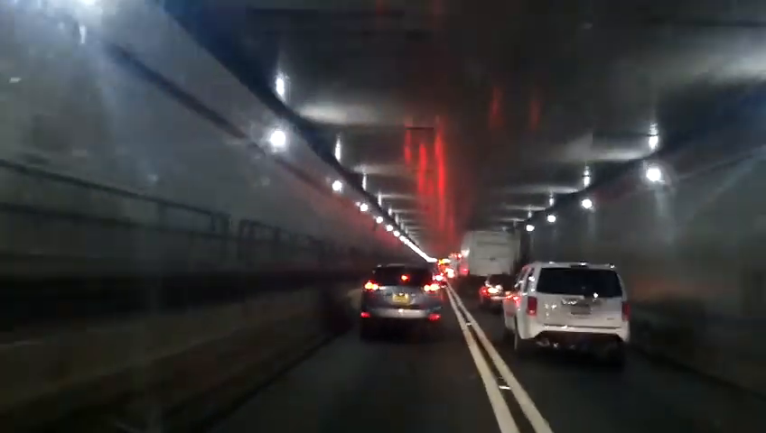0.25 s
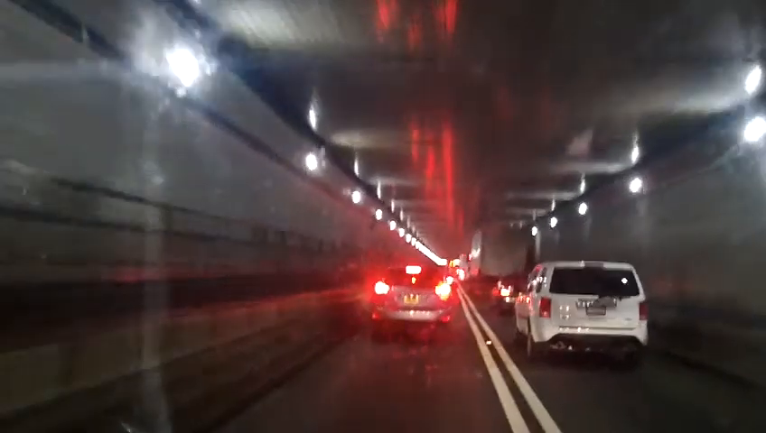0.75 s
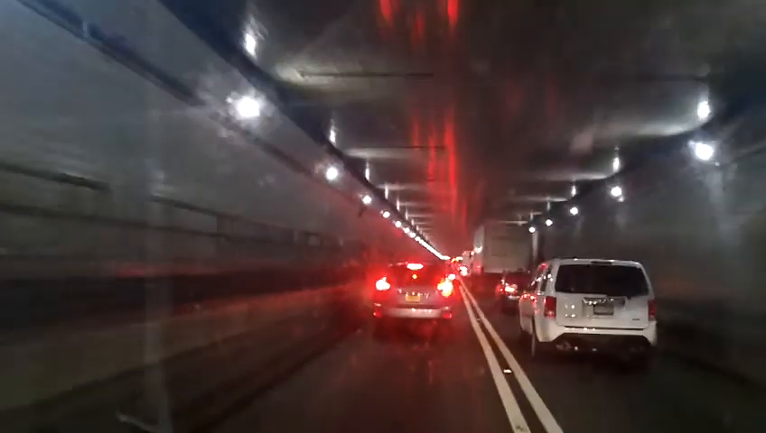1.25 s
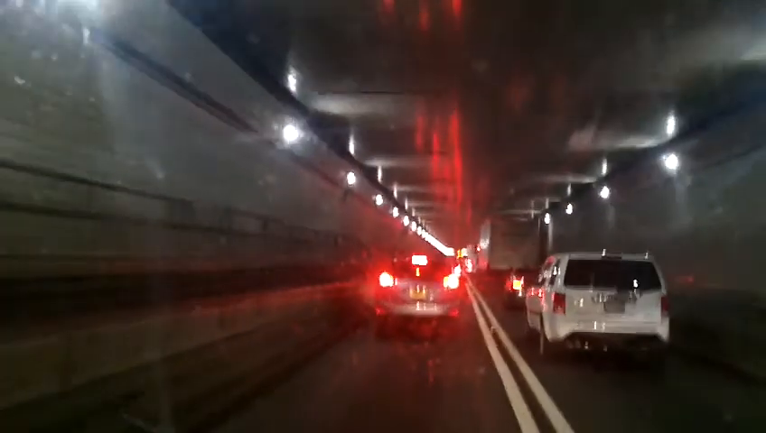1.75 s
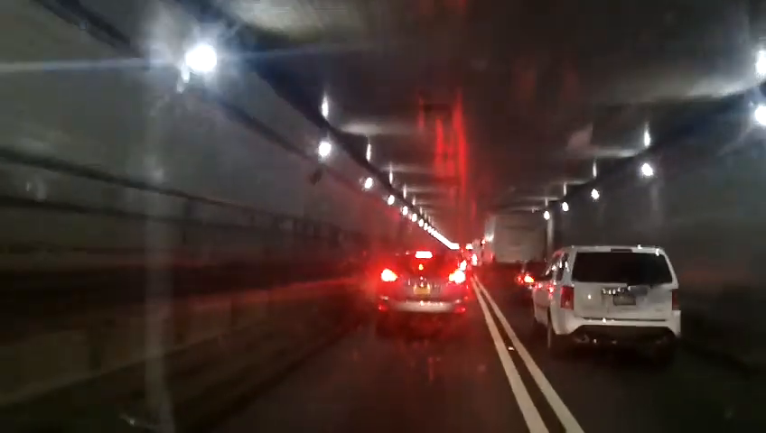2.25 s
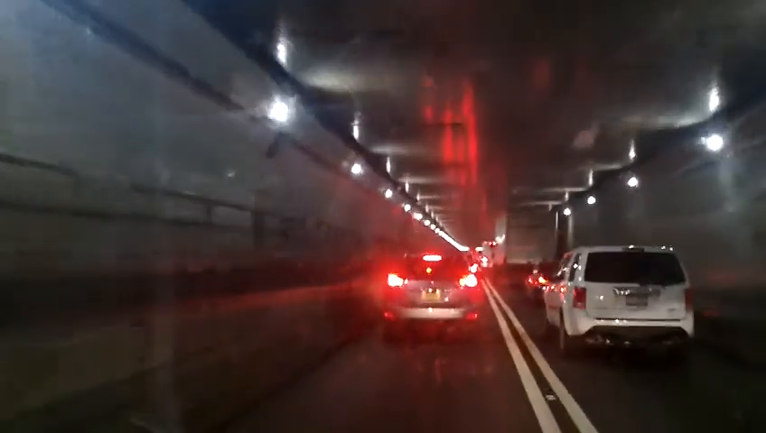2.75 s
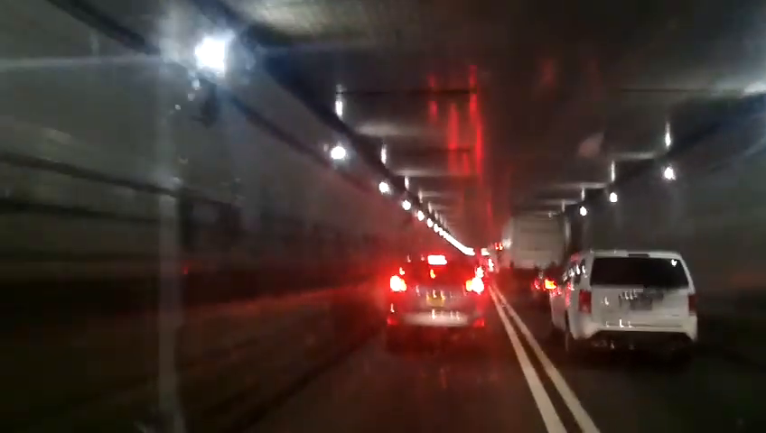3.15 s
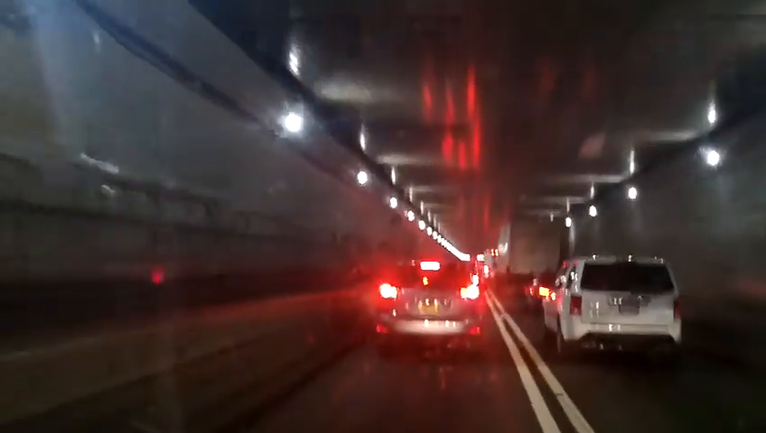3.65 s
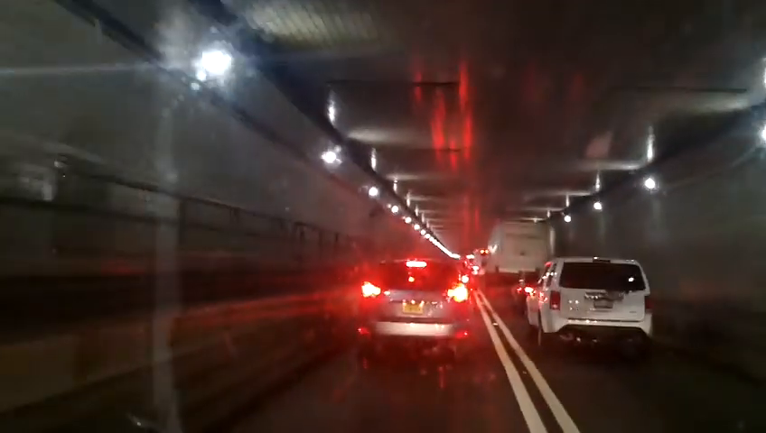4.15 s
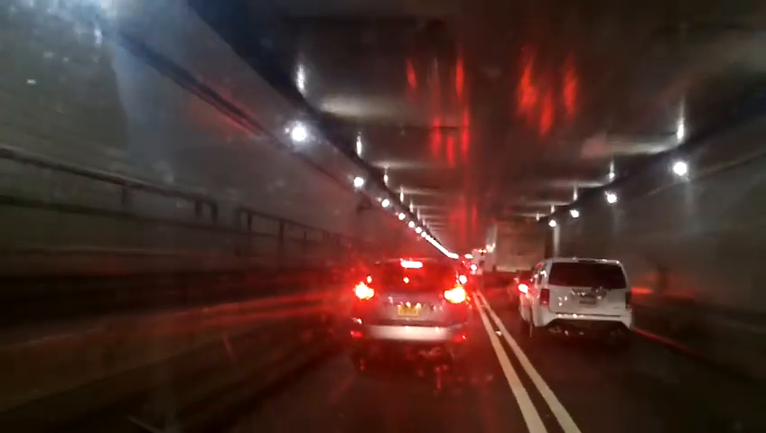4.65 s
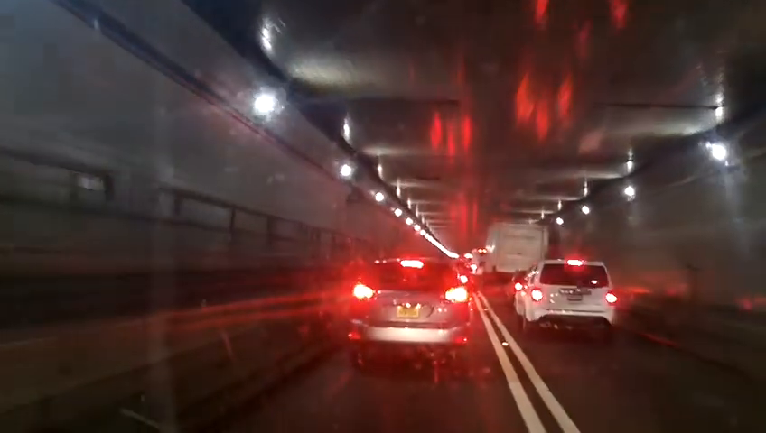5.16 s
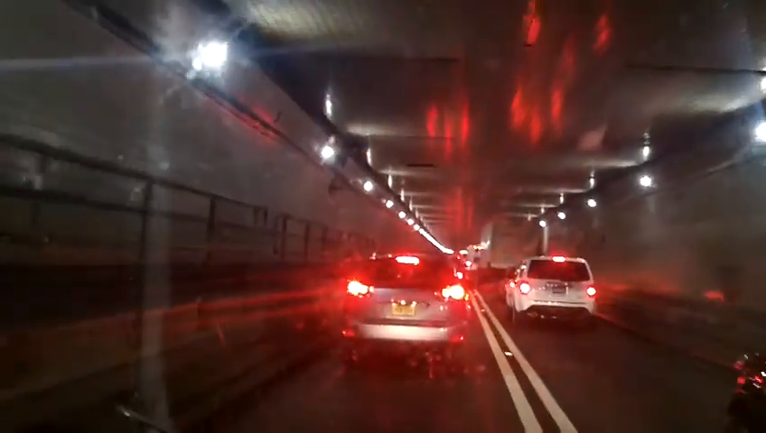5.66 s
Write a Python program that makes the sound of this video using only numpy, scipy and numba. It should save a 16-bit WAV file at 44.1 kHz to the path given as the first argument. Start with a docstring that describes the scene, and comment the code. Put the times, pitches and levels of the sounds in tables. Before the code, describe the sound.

Inside a car driving through a tunnel with a window open, a low roar of tyres and engines fills the cabin. Air throbs at the opening in deep, irregular bouts, overloading the microphone with crackling thuds that duck the roar. After about four seconds the throbbing dies away and the roar continues, clearer. Short, rough, high chinks and buzzes sound in the second half, and the car body booms low.

```python
"""Car in a tunnel, window open.

Road roar fills the cabin, and air over the window opening sets it throbbing below the range of hearing.
The throb overloads the recorder, whose stepped gain control ducks the roar and crackles on the crests.
After four seconds the throb all but dies and the roar stands free. The body booms, and short, rough,
high-pitched chinks and buzzes sound in the second half."""
import sys
import numpy as np
from scipy import signal
from scipy.fft import rfft, irfft, next_fast_len
from scipy.io import wavfile
from numba import njit

SR = 44100
rng = np.random.default_rng(int(sys.argv[2]) if len(sys.argv) > 2 else 0)


def unload_audio(sound):
    """Save the sound as a 16-bit wav file, at the path given as the first command line argument."""
    columns = np.transpose(np.atleast_2d(sound))
    # keep every value between -1 and 1, then stretch to whole-number steps
    steps = np.round(np.clip(columns, -1, 1) * 32767)
    wavfile.write(sys.argv[1], SR, steps.astype(np.int16))


N = 260631
T = np.arange(N) / SR


def gain_of(db):
    """Decibels to amplitude factor."""
    return 10 ** (np.asarray(db) / 20)


def unit_rms(x):
    """Scale to an rms of one."""
    return x / np.sqrt(np.mean(x ** 2) + 1e-20)


def curve(rows):
    """Linear envelope through (time_s, value) rows."""
    return np.interp(T, *np.transpose(rows))


def coloured(x, points):
    """Filter by (freq_hz, gain_db) points joined on a log-frequency axis."""
    size = next_fast_len(N + 4096)
    hz, db = np.transpose(points)
    shape_db = np.interp(np.log(np.fft.rfftfreq(size, 1 / SR) + 1), np.log(hz + 1), db)
    return irfft(rfft(x, size) * gain_of(shape_db), size)[:N]


def drift(rate_hz):
    """Random wander of unit rms, rate_hz knots a second."""
    knots = rng.standard_normal(2048)
    return unit_rms(np.interp(T * rate_hz, np.arange(len(knots)), knots))


def resonant_noise(pitch_hz, width_hz):
    """One noise-driven resonance, unit rms."""
    pole = np.exp((-np.pi * width_hz + 2j * np.pi * pitch_hz) / SR)
    return unit_rms(signal.lfilter([1], [1, -pole], rng.standard_normal(N)).real)


# Strongest gusts, heard as crackling thuds: time_s, crest_db
GUSTS = [(0.114, -2), (0.133, 3), (0.213, -2), (0.268, -2), (0.313, 0), (0.368, 6), (0.466, 8.5),
         (0.494, 13.0), (0.524, 11.5), (0.71, -3.5), (0.729, 7.5), (0.79, 7), (1.014, 1.5), (1.04, 6.5),
         (1.116, 2.0), (1.201, 5.5), (1.255, 6.5), (1.283, 9.5), (1.568, 4), (1.625, 8), (1.731, 0),
         (1.833, -4), (1.911, 2.5), (1.945, 7.5), (1.998, 5), (2.084, 9), (2.194, 5.5), (2.281, 5),
         (2.33, 5.5), (2.386, 10.5), (2.498, 5), (2.556, 10.5), (2.718, -0.6), (2.758, 3.5), (2.837, 4.5),
         (2.871, 9.5), (2.909, 14.5), (2.976, 10.3), (3.064, 10.5), (3.119, 11), (3.154, 16), (3.263, 2),
         (3.303, -2), (3.504, -0.8), (3.564, 1.2), (3.635, 5), (3.672, 6.4), (3.702, 9), (3.733, 9),
         (3.849, -5.5), (3.928, 10), (3.998, 5), (5.181, -5.5), (5.213, 0.5), (5.568, -6.5)]


def throb(buffet_db, cabin_hz=17.5, gust_s=0.01, overtone_db=-17,
          stumble_turns=0.095, stumble_hz=35, falter_db=1.0, falter_hz=20):
    """Cabin air bounces on the window opening as in a bottle's neck; each gust lands on a crest."""
    time_s, crest_db = np.transpose(GUSTS)
    half_swings = np.maximum(np.round(2 * cabin_hz * np.diff(time_s)), 1)
    turns_at_gusts = np.append(0, np.cumsum(half_swings) / 2)
    turns = cabin_hz * T + np.interp(T, time_s, turns_at_gusts - cabin_hz * time_s)
    gusts = np.exp(-((T - time_s[:, None]) / gust_s) ** 2)
    in_gust = gusts.sum(0)
    between = 1 - in_gust
    angle = 2 * np.pi * (turns + stumble_turns * between * drift(stumble_hz))
    height_db = crest_db @ gusts + between * (buffet_db - falter_db * abs(drift(falter_hz)))
    # The jet flaps in and out of the opening, sharpening the gust crests.
    overtone = gain_of(overtone_db) * in_gust * np.cos(3 * angle)
    return gain_of(height_db) * (np.cos(angle) + overtone)


# Bouts of throb: start_s, length_s, crest_db
BOUTS = [(0.111, 0.36, -5), (0.498, 0.1, 4.5), (0.743, 0.058, 6), (1.011, 0.22, 1.5), (1.249, 0.082, 8),
         (1.569, 0.19, -1.5), (1.918, 0.31, 3), (2.347, 0.31, 7.5), (2.708, 0.13, -0.5),
         (2.943, 0.273, 8.5), (3.532, 0.2, -0.5), (3.73, 0.032, 8.5), (3.894, 0.15, -1.5),
         (5.207, 0.07, -5.5)]
# Resting sway of the air: time_s, crest_db
SWAY = [(0, -8), (.9, -20.5), (1.45, -17), (2.0, -18), (3.4, -15.5), (3.87, -12), (4.13, -35), (4.4, -50)]


def buffet(grow_db_per_s=302, die_db_per_s=195.5):
    """Throb envelope in dB: the airflow locks in for a bout, holds, then falls back to a sway."""
    start_s, length_s, crest_db = np.transpose(BOUTS)[:, :, None]
    before_s = np.maximum(start_s - T, 0)
    after_s = np.maximum(T - start_s - length_s, 0)
    bouts_db = crest_db - grow_db_per_s * before_s - die_db_per_s * after_s
    return np.maximum(bouts_db.max(0), curve(SWAY))


# Turbulence spectrum: freq_hz, density_db
EDDY_SPECTRUM = [(20, -10.5), (40, -3), (55, -2), (75, 0), (110, -6), (170, -9), (300, -16.5), (500, -28),
                 (1200, -46.5), (4000, -95.5)]


def eddies(buffet_db, level_db=-17.0, follow_db_per_db=0.37):
    """Low turbulence at the opening grows with the throb, less steeply."""
    turbulence = unit_rms(coloured(rng.standard_normal(N), EDDY_SPECTRUM))
    return gain_of(level_db + follow_db_per_db * buffet_db) * turbulence


# Roar in the cabin: time_s, level_db
ROAD_LEVEL = [(0, -23.5), (.8, -25), (1.5, -24), (2.0, -25), (3.1, -26.5), (4.1, -22), (5.9, -22.5)]
# Roar spectrum: freq_hz, density_db
ROAD_SPECTRUM = [(20, 5), (45, 7), (70, -3), (140, -1), (190, -7), (265, -5.5), (400, -11.5), (600, -13.5),
                 (760, -12), (1000, -19), (2000, -20), (2950, -22.5), (3900, -33), (6500, -43), (9500, -46)]


def road_roar(waver_db=0.78, waver_hz=14):
    """Tyres and engines, blurred by the tunnel into an even roar."""
    roar = unit_rms(coloured(rng.standard_normal(N), ROAD_SPECTRUM))
    return gain_of(curve(ROAD_LEVEL) + waver_db * drift(waver_hz)) * roar


# Inrushes at the window: centre_s, level_db, half_width_s, low_cut_hz
RUSHES = [(.05, -40, 0.039, 300), (0.93, -27.5, .045, 448), (1.485, -29.5, 0.061, 170),
          (1.833, -36, 0.05, 220), (2.815, -29, 0.0194, 80), (3.41, -38, 0.052, 218)]


def air_rushes():
    """Air rushes in where the throb lets go: brief swells of roar without the deepest bass."""
    roar = coloured(rng.standard_normal(N), ROAD_SPECTRUM)
    out = np.zeros(N)
    for centre_s, level_db, half_width_s, low_cut_hz in RUSHES:
        high_pass = signal.butter(2, low_cut_hz, "high", fs=SR, output="sos")
        swell = np.exp(-((T - centre_s) / half_width_s) ** 2)
        out += gain_of(level_db) * swell * unit_rms(signal.sosfilt(high_pass, roar))
    return out


# Body boom: time_s, level_db
BOOM_LEVEL = [(4.05, -22.5), (4.3, -42), (5.0, -32), (5.2, -23.5), (5.55, -18.5), (5.75, -33)]


def body_boom(hum_db=-43, high_cut_hz=400):
    """The road surface excites a low boom of the body and a fainter cabin hum."""
    boom = gain_of(curve(BOOM_LEVEL)) * resonant_noise(pitch_hz=44.7, width_hz=5.8)
    hum = gain_of(hum_db) * resonant_noise(pitch_hz=258, width_hz=22)
    low_pass = signal.butter(2, high_cut_hz, fs=SR, output="sos")
    return signal.sosfilt(low_pass, boom + hum)


# Chinks and buzzes: start_s, pitch_hz, level_db, rise_s
CHINKS = [(3.318, 2950, -40, .014), (3.32, 5800, -55, .014), (3.342, 2350, -32, .004),
          (3.409, 2345, -33, .004), (3.477, 2340, -26, .004), (3.556, 2340, -26, .003),
          (3.912, 2345, -30, .005), (3.99, 2340, -24, .005), (4.067, 2338, -28, .004),
          (4.532, 3400, -32, .005), (5.101, 2345, -26, .005), (5.604, 3130, -34, .005)]


def chinks(chatter_hz=350, pitch_waver=0.0067):
    """Short, rough, high chinks and buzzes, mostly near 2340 Hz; each is one tone that swells and dies."""
    chatter = unit_rms(1 + drift(chatter_hz))
    warped_s = np.cumsum(1 + pitch_waver * drift(chatter_hz)) / SR
    out = np.zeros(N)
    for start_s, pitch_hz, level_db, rise_s in CHINKS:
        sounding = (T > start_s) & (T < start_s + 10 * rise_s)
        age = (T[sounding] - start_s) / rise_s
        envelope = gain_of(level_db) * age * np.exp(1 - age)
        out[sounding] += envelope * np.sin(2 * np.pi * pitch_hz * warped_s[sounding])
    return out * chatter


def scene():
    """Air pressure at the microphone, mono."""
    buffet_db = buffet()
    window = throb(buffet_db) + eddies(buffet_db)
    return (window + road_roar() + air_rushes() + body_boom() + chinks())[None]


def clock(rate_hz, scatter):
    """One tick a period, randomly late by up to scatter periods; scatter may vary in time."""
    beats_s = np.arange(0, T[-1], 1 / rate_hz)
    max_late = np.interp(beats_s, T, np.clip(scatter * np.ones(N), 0, 1))
    late_s = max_late * rng.random(N)[:len(beats_s)] / rate_hz
    return np.isin(np.arange(N), ((beats_s + late_s) * SR).astype(int))


@njit
def stepped_gain(x, fast_due, slow_due, lift_due, start_db=-4.0, hard_db=-12.3, soft_db=-14.0,
                 hard_drop_db=0.75, soft_drop_db=0.25, lift_db=0.1954, hold_s=0.0046):
    """Gain drops coarsely above hard_db, finely above soft_db, and climbs back after hold_s of calm."""
    hard, soft = 10 ** (hard_db / 20), 10 ** (soft_db / 20)
    gain_db, calm_samples = start_db, 0
    out = np.zeros(len(x))
    for n in range(len(x)):
        out[n] = x[n] * 10 ** (gain_db / 20)
        size = abs(out[n])
        calm_samples = calm_samples + 1 if size < soft else 0
        if size > hard and fast_due[n]:
            gain_db -= hard_drop_db
        elif size > soft and slow_due[n]:
            gain_db -= soft_drop_db
        elif calm_samples > SR * hold_s and lift_due[n]:
            gain_db = min(gain_db + lift_db, 0.0)
    return out


# Recorder response: freq_hz, gain_db
RESPONSE = [(20, -1.5), (5000, -3), (6500, -4.5), (7300, -10.5), (7800, -21.5), (8200, -16), (8900, -8),
            (9600, -4.5), (14500, -6), (15200, -15)]


def record(dry, low_cut_hz=7, high_cut_hz=15550):
    """Gain control, then filters. Each gain step ticks; quick runs buzz when even, snap when uneven."""
    fast_due = clock(rate_hz=2400, scatter=0.45 * drift(rate_hz=12))
    slow_due = clock(rate_hz=400, scatter=1.0)
    lift_due = clock(rate_hz=1500, scatter=0.94)
    ducked = stepped_gain(dry[0], fast_due, slow_due, lift_due)
    high_pass = signal.butter(1, low_cut_hz, "high", fs=SR)
    shaped = coloured(signal.lfilter(*high_pass, ducked), RESPONSE)
    low_pass = signal.firwin(511, high_cut_hz, window=("kaiser", 9), fs=SR)
    return signal.oaconvolve(shaped, low_pass, "same")[None]


dry = scene()
out = record(dry)
unload_audio(out)
```